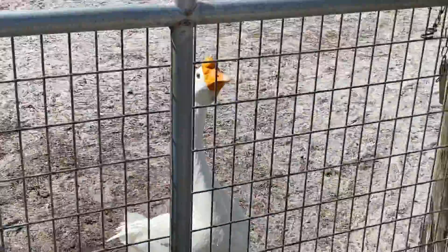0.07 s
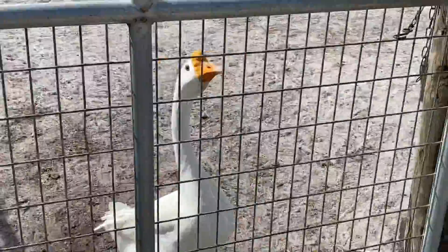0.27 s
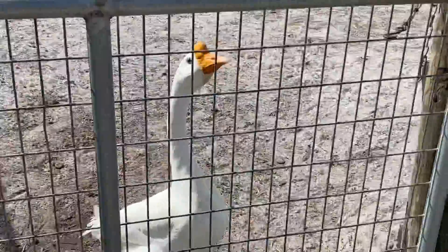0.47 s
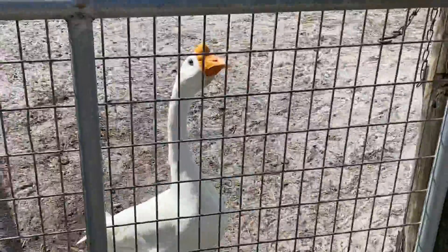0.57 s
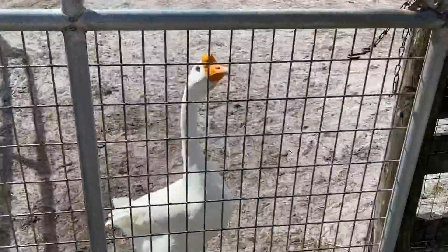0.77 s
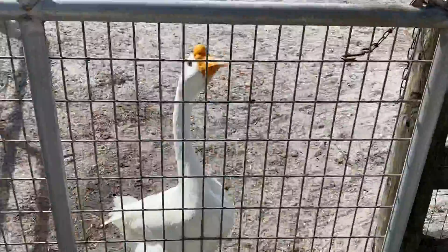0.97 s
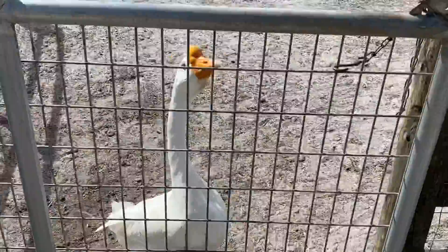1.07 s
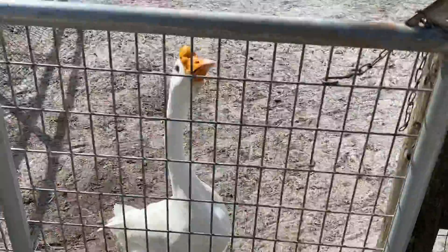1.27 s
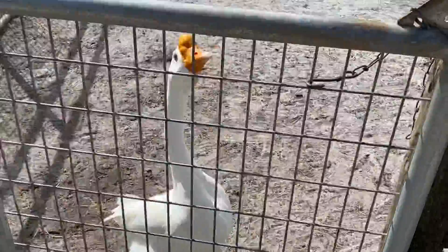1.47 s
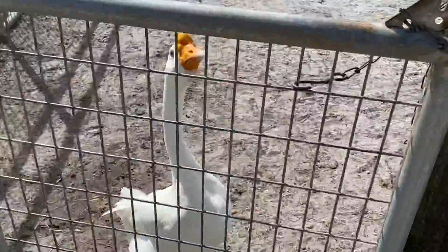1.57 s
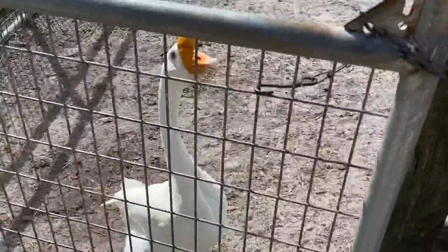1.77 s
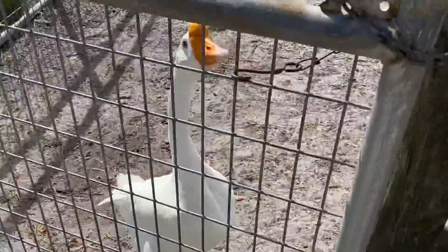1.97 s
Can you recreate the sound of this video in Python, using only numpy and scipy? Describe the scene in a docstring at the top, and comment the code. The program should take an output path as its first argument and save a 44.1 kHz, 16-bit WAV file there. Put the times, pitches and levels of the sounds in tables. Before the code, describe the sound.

Single loud goose honk a few steps away in an open dirt pen, with faint handling knocks.

```python
"""A goose gives one honk from a few steps away in an outdoor pen.
A low flutter of air with a faint hum and a hiss run throughout; scuffs, soft knocks and bumps come and go.
The call swells on a low note, cracks up a fifth into a brassy blare, beats against a second, higher note,
sinks into a hoarse grunt and dies away on a few wavering tones. Notes are stacks of trembling harmonics;
rasp, hiss and scuffs are coloured noise; knocks are fading sine tones with a tick."""
import sys
import numpy as np
from scipy import signal
from scipy.fft import rfft, irfft
from scipy.io import wavfile

SR = 44100
rng = np.random.default_rng(int(sys.argv[2]) if len(sys.argv) > 2 else 0)


def wav_record(signal):
    """Record a signal, one row per channel, as 16-bit PCM in the file named by sys.argv[1]."""
    frames = np.transpose(np.atleast_2d(signal))
    bounded = np.clip(frames, -1, 1)
    # unit amplitude maps onto the largest positive 16-bit level
    quanta = np.round(bounded * 32767).astype(np.int16)
    wavfile.write(sys.argv[1], SR, quanta)


N = 88861
T = np.arange(N) / SR  # time of every sample, in seconds


def from_db(db):
    """Decibels to gain."""
    return 10 ** (np.asarray(db) / 20)


def rms_one(x):
    """Scale to an average strength (rms) of 1."""
    return x / np.sqrt(np.mean(x ** 2) + 1e-20)


def in_time(rows):
    """Each column of a curve after the first (seconds), read at every sample."""
    s, *columns = np.transpose(rows)
    return [np.interp(T, s, c) for c in columns]


def gate(rows):
    """Open from the first to the last time of a curve, with 3 ms fades."""
    first_s, last_s = rows[0][0], rows[-1][0]
    return np.clip(np.minimum(T - first_s, last_s - T) / .003, 0, 1)


def at_hz(points, hz):
    """Read a spectrum at any frequency, with even steps per octave."""
    f, v = np.transpose(points)
    return np.interp(np.log(np.maximum(hz, 1)), np.log(f), v)


def drift(rate_hz):
    """Smooth random wandering with spread 1: noise with its fast changes filtered out."""
    r = np.exp(-2 * np.pi * rate_hz / SR)
    raw = rng.standard_normal(N + SR)
    settled = signal.lfilter([1], [1, -2 * r, r * r], raw)[SR:]  # skip the filter's first second
    return rms_one(settled)


def noise(spectrum):
    """Random noise coloured by a spectrum, with rms 1."""
    gain = from_db(at_hz(spectrum, np.fft.rfftfreq(N, 1 / SR)))
    return rms_one(irfft(rfft(rng.standard_normal(N)) * gain, N))


def wide_noise(spectrum):
    """Coloured stereo noise: separate middle and side noises give the width of the open air."""
    # Each row: frequency in Hz, side minus middle in dB.
    width = [(50, -13.5), (140, -12), (300, -11), (700, -8), (1500, -1), (3000, -18.5), (6000, -31.5),
             (8500, 8.5), (11000, -9.5), (14000, 1.5)]
    side_gain = from_db(at_hz(width, np.fft.rfftfreq(N, 1 / SR)))
    mid = noise(spectrum)
    side = irfft(rfft(noise(spectrum)) * side_gain, N)
    return rms_one(np.array([mid + side, mid - side]))


def cycle(hz, jitter):
    """Phase in radians of a tone whose pitch trembles; jitter is the spread as a share of the pitch."""
    trembling_hz = hz * (1 + jitter * drift(244))
    return 2 * np.pi * np.cumsum(trembling_hz) / SR


def partial(phase, db):
    """One harmonic whose level shimmers a little, starting at a random point of its cycle."""
    shimmer_db = 1.28 * drift(54)
    return from_db(db + shimmer_db) * np.cos(phase + rng.uniform(0, 2 * np.pi))


def rough_air(rows, spectrum, flicker_db):
    """Air forced through the throat in uneven puffs: coloured noise with a flickering level."""
    level_db = in_time(rows)[0] + flicker_db * drift(330)
    return from_db(level_db) * gate(rows) * noise(spectrum)


def background():
    """Low flutter of air with a faint wavering hum, and a hiss; both dip during or after the call."""
    # Loudness of the flutter and of the hiss. Each row: time in seconds, level in dB.
    flutter, hiss = [(0, -45.5), (.45, -45), (.65, -48), (.86, -46), (1.0, -47.5), (1.2, -46),
                     (1.35, -61.5), (1.55, -46.5), (1.72, -48), (1.82, -48.5), (2.01, -45)], [(0, -45.5), (.19, -46), (.3, -46), (.7, -46.5), (.88, -47.5),
                                      (1.1, -46.5), (1.3, -46.5), (1.45, -58.5), (1.6, -48.5),
                                      (2.01, -50.5)]
    # Their colours. Each row: frequency in Hz, relative level in dB.
    flutter_spectrum, hiss_spectrum = [(22, -28), (38, -7), (60, -2.5), (90, -2.5), (125, -8.5), (180, -11),
                                       (240, -15.5), (400, -25), (900, -39.5), (3000, -56)], [(150, -21), (300, -1.5), (550, -2.5),
                                                                 (800, 0.5), (1300, -2), (2500, -1.5),
                                                                 (5000, -4), (7000, -6), (8500, -14.5),
                                                                 (10000, -6), (12000, -18.5), (14000, -9),
                                                                 (16000, -18)]
    hum_db = -7 + 2 * drift(6.8)  # relative to the flutter
    hum = from_db(hum_db) * np.sin(cycle(174.6, jitter=0.017))
    low_air = from_db(in_time(flutter)[0]) * (wide_noise(flutter_spectrum) + hum)
    high_air = from_db(in_time(hiss)[0]) * wide_noise(hiss_spectrum)
    return low_air + high_air


def bumps():
    """Soft low bumps on the microphone: sine tones that swell and fade within a few cycles."""
    # Each row: middle in seconds, level in dB, pitch in Hz.
    bump_rows = [(0.426, -39.5, 67.6), (.845, -38.5, 76), (0.949, -32, 67), (1.827, -33, 81.5),
                 (1.95, -36, 63.6)]
    out = np.zeros(N)
    for s, db, hz in bump_rows:
        cycles = (T - s) * hz
        swell = np.exp(-(cycles / 0.88) ** 2)
        out += from_db(db) * swell * np.sin(2 * np.pi * cycles)
    return out


def scuffs():
    """Short grainy rubs on dry dirt: swells of coloured noise with a quickly flickering level."""
    # Each row: middle in seconds, level in dB, length (spread of the swell) in seconds.
    scuff_rows = [(0.101, -44.5, 0.0044), (0.201, -47.5, 0.034), (0.795, -48, 0.015), (0.883, -53, 0.031),
                  (1.607, -51, 0.018)]
    # Each row: frequency in Hz, relative level in dB.
    spectrum = [(200, -28), (650, 6.5), (1400, -1.5), (2500, -8), (6000, -21)]
    level = sum(from_db(db) * np.exp(-.5 * ((T - s) / length) ** 2) for s, db, length in scuff_rows)
    return level * from_db(4.9 * drift(200)) * noise(spectrum)


def knocks():
    """Dull, quickly damped knocks: a few fading sine tones, each knock with a small noisy tick."""
    # Each row: start in seconds, level in dB, centre of the colour in Hz, tick in dB relative to the knock.
    knock_rows = [(0.4026, -26, 620, -12), (0.8062, -34.5, 790, -32), (1.481, -19, 430, -8),
                  (1.541, -32.5, 651, -18)]
    # The tones they ring with. Each row: pitch in Hz, relative level in dB, seconds to fade by 60 dB.
    modes = [(115, -15, 0.11), (353, -2.5, 0.033), (511, -2.5, 0.039), (782, 2, 0.028), (1370, -2.5, 0.016),
             (2100, 4, 0.0067), (2800, -10, .025)]
    # Colour of the tick. Each row: frequency in Hz, relative level in dB.
    tick_spectrum = [(1800, 5), (3200, -15), (6000, -11), (12000, -27)]
    fall_db_per_octave, tick_s = 4, 0.0018
    out = np.zeros(N)
    for s, db, centre_hz, tick_db in knock_rows:
        age = np.maximum(T - s, 0)
        body = np.zeros(N)
        for k, (hz, level_db, t60) in enumerate(modes):
            octaves_away = abs(np.log2(hz / centre_hz))
            ring_db = level_db - fall_db_per_octave * octaves_away - 60 * age / t60
            sign = (-1) ** k  # every other tone starts downwards
            body += sign * from_db(ring_db) * np.sin(2 * np.pi * hz * age)
        tick = from_db(tick_db) * (T > s) * np.exp(-age / tick_s) * noise(tick_spectrum)
        out += from_db(db) * (body + tick)
    return out


def side_note(rows, harmonics_db, jitter):
    """A note beside the blare, built from its harmonics: its sound and its phase."""
    hz, db, overtones_db = in_time(rows)
    phase = cycle(hz, jitter)
    sound = sum(partial(k * phase, h + overtones_db * (k > 1)) for k, h in enumerate(harmonics_db, 1))
    return from_db(db) * gate(rows) * sound, phase


def low_note():
    """The opening note of the call, which lingers under the blare."""
    # Each row: time in seconds, pitch in Hz, level in dB, extra level of the overtones in dB.
    curve = [(1.138, 681.6, -57, -16), (1.15, 693, -31, 4.5), (1.165, 743.6, -23.5, 2),
             (1.18, 765, -13, -8.5), (1.2, 798, -10, -23.5), (1.212, 761, -27, -25), (1.228, 755, -34, -25),
             (1.262, 780.7, -21, -23), (1.3, 799, -42, -22), (1.39, 779, -41, -22)]
    # Relative level in dB of each harmonic, from the first upwards.
    harmonics_db = [2, -7, -9.5, -12, -16.5, -14.5, -27, -27, -53]
    return side_note(curve, harmonics_db, jitter=0.0057)


def high_note():
    """The second, higher note, which joins late in the blare."""
    # Each row: time in seconds, pitch in Hz, level in dB, extra level of the overtones in dB.
    curve = [(1.308, 1425, -68, -11), (1.322, 1441, -34, 7), (1.355, 1454, -42.5, 4.5),
             (1.378, 1449, -31, 4.5), (1.392, 1442, -37, 5), (1.408, 1410, -62, -18)]
    # Relative level in dB of each harmonic, from the first upwards.
    harmonics_db = [5, 2.5, -12, -5.5, -20, -31, -13.5]
    return side_note(curve, harmonics_db, jitter=0.0051)


def blare():
    """Brassy main note: nine harmonics of a membrane, coloured by the throat; its sound and its phase."""
    # Each row: time in seconds, pitch in Hz, level in dB, extra for the octave in dB,
    # extra for the upper overtones in dB.
    curve = [(1.198, 1106, -56, -17, -13), (1.204, 1122, -13, -6.5, -23), (1.222, 1143, -15, -1.5, -1),
             (1.242, 1161, -14.5, -2.5, -2), (1.268, 1172, -17.5, -6.5, 9.5), (1.288, 1178, -19, -10.5, 9),
             (1.315, 1197, -20, -5.5, 1.5), (1.328, 1190, -21.5, -13, 2), (1.347, 1185, -16.5, -4, -4),
             (1.361, 1198, -22, 6.5, -5), (1.376, 1230, -39, 6, -14), (1.39, 1210, -66, 0, -7)]
    # What the throat lets through. Each row: frequency in Hz, relative level in dB.
    throat = [(1150, 2.5), (2350, 3), (3420, -24), (3500, -11), (3600, -16.5), (4500, 5), (4590, -2.5),
              (4680, -16), (4800, -7), (5700, -18), (5870, -20.5), (6800, -26), (7070, -23), (8300, -25),
              (9300, -60), (10700, -28.5)]
    hz, db, octave_db, upper_db = in_time(curve)
    phase = cycle(hz, jitter=0.0036)
    extra_db = [0, octave_db] + [upper_db] * 7
    sound = sum(partial(k * phase, db + at_hz(throat, k * hz) + extra)
                for k, extra in enumerate(extra_db, 1))
    return gate(curve) * sound, phase


def beats(rows, pairs, blare_phase, note_phase):
    """Sum and difference tones of two coupled membranes."""
    db, upper_db = in_time(rows)
    out = np.zeros(N)
    for n, m, level_db in pairs:
        mixed_phase = n * blare_phase + m * note_phase
        hz = np.gradient(mixed_phase) * SR / (2 * np.pi)
        upper = np.average(hz, weights=gate(rows)) > 3000
        out += partial(cycle(hz, jitter=.002), db + level_db + upper_db * upper)
    return out * gate(rows)


def low_beats(blare_phase, low_phase):
    """Mixed tones of the blare and the low note."""
    # Each row: time in seconds, level in dB, extra for tones above 3 kHz in dB.
    curve = [(1.199, -24, -10), (1.208, -21, -25), (1.226, -36, -2), (1.242, -25, 0), (1.262, -20, -0.5),
             (1.274, -32, -4), (1.292, -35, 0), (1.325, -50, 2)]
    # Each row: multiple of the blare, multiple of the low note, relative level in dB.
    pairs = [(1, 1, 0), (3, -1, -1), (2, 1, -19), (4, -1, -11), (3, 1, -14), (5, -1, -12), (4, 1, -20),
             (6, -1, -15), (5, 1, -21), (7, -1, -17), (6, 1, -24)]
    return beats(curve, pairs, blare_phase, low_phase)


def high_beats(blare_phase, high_phase):
    """Mixed tones of the blare and the high note."""
    # Each row: time in seconds, level in dB, extra for tones above 3 kHz in dB.
    curve = [(1.313, -52, 2), (1.324, -34.5, 6.5), (1.345, -25, -3), (1.356, -23.5, 2), (1.366, -20, -32),
             (1.378, -25.5, -26), (1.39, -48, -11)]
    # Each row: multiple of the blare, multiple of the high note, relative level in dB.
    pairs = [(2, -1, -13), (-1, 2, -16), (-2, 3, -13), (3, -1, -13), (1, 1, 0), (4, -1, -19), (2, 1, -5),
             (1, 2, -15), (3, 1, -3), (2, 2, -15), (4, 1, -7), (5, 1, -16), (6, 1, -26), (8, 1, -27)]
    return beats(curve, pairs, blare_phase, high_phase)


def rasp(blare_phase):
    """Rasp of the membranes, and grit in the top of the call that pulses with each cycle of the blare."""
    # Loudness of the rasp and of the grit. Each row: time in seconds, level in dB.
    rasp_level, grit_level = [(1.14, -73), (1.16, -40), (1.196, -40), (1.206, -20.5), (1.235, -26.5),
                              (1.27, -34), (1.305, -34), (1.33, -33.5), (1.36, -32), (1.385, -32),
                              (1.403, -48), (1.42, -71)], [(1.2, -62), (1.212, -47), (1.24, -46), (1.275, -37),
                                            (1.315, -46), (1.335, -39), (1.355, -32.5), (1.372, -50),
                                            (1.395, -61)]
    # Their colours. Each row: frequency in Hz, relative level in dB.
    rasp_throat, grit_spectrum = [(300, -62), (640, -47), (760, -19), (930, 13), (1080, -21), (1350, 0),
                                  (1600, -23), (2000, 0), (2700, -4), (3200, -4.5), (4600, -6.5),
                                  (5400, -13.5), (6200, -11), (8000, -24), (15000, -39)], [(3000, -13), (5000, -10), (6300, -8), (8000, -1),
                                                       (9500, 3), (10800, -2), (12200, -29), (14000, 0),
                                                       (16000, -26)]
    pulse = 1 + 0.51 * np.cos(blare_phase)
    grit = rough_air(grit_level, grit_spectrum, flicker_db=1.5) * pulse
    return rough_air(rasp_level, rasp_throat, flicker_db=1.2) + grit


def honk():
    """The blare, the two notes that beat against it, and rasp."""
    low, low_phase = low_note()
    high, high_phase = high_note()
    main, phase = blare()
    mixed = low_beats(phase, low_phase) + high_beats(phase, high_phase)
    return low + high + main + mixed + rasp(phase)


def grunt():
    """The slackening membrane sinks in pitch and turns hoarse: twelve harmonics plus rough air."""
    # Each row: time in seconds, pitch in Hz, level in dB.
    curve = [(1.375, 604, -70), (1.395, 572.3, -39), (1.412, 497, -34.5), (1.423, 449, -24.5),
             (1.433, 439.3, -25), (1.448, 437.6, -28.5), (1.465, 410, -46), (1.482, 390, -42.5),
             (1.5, 441, -40), (1.528, 423, -67), (1.545, 404, -52)]
    # Loudness of the hoarseness. Each row: time in seconds, level in dB.
    hoarse = [(1.38, -54), (1.41, -35), (1.428, -35), (1.45, -54), (1.468, -31), (1.5, -38.5),
              (1.527, -52.5), (1.55, -52)]
    # Throat for the voice and for the hoarse air. Each row: frequency in Hz, relative level in dB.
    voice_throat, hoarse_throat = [(380, -45), (470, -3.5), (600, 11), (720, 24), (880, 4), (1100, -22),
                                   (1350, -7), (1800, -14), (2250, -8.5), (2650, -9), (3000, -23),
                                   (4300, -27), (7000, -38)], [(400, -25), (690, -13), (790, -2), (900, 7.5),
                                                         (1030, 11.5), (1200, -21), (1500, -40), (1630, 13),
                                                         (1780, -38), (2200, -18), (2500, -10), (2950, -37),
                                                         (4300, -32), (7000, -33)]
    hz, db = in_time(curve)
    phase = cycle(hz, jitter=0.029)
    voice = np.zeros(N)
    for k in range(1, 13):
        flicker_db = 1.5 * drift(65)
        voice += partial(k * phase, db + at_hz(voice_throat, k * hz) + flicker_db)
    return voice * gate(curve) + rough_air(hoarse, hoarse_throat, flicker_db=4.0)


def aftertone():
    """A few tones of wavering pitch as the call runs out of air."""
    # Each row: time in seconds, level in dB.
    curve = [(1.452, -56), (1.467, -46), (1.482, -50), (1.497, -38), (1.524, -38.5), (1.54, -67)]
    # Each row: pitch in Hz, relative level in dB.
    tones = [(785, 6), (1020, 0), (1620, -16), (2460, -21)]
    db, = in_time(curve)
    sound = sum(partial(cycle(hz, jitter=0.0107), db + level_db) for hz, level_db in tones)
    return gate(curve) * sound


def at_ports(x):
    """Left and right: level and phase differences between the two microphone ports."""
    # Each row: frequency in Hz, left minus right in dB.
    balance = [(60, 1), (110, 1.0), (200, 4), (380, 3), (700, 1.5), (1290, 3.5), (2380, 2.5), (4400, 2.5),
               (8120, 0), (15000, 0.0)]
    # Each row: frequency in Hz, radians by which the left leads.
    lead = [(100, 0), (700, 0.12), (1200, 0.4), (2400, 0.62), (4000, .5), (6800, 0.42), (8500, 2.5),
            (11000, 2), (14000, 1.8)]
    hz = np.fft.rfftfreq(N, 1 / SR)
    # Half of the difference goes to the left, the opposite half to the right.
    half = from_db(at_hz(balance, hz) / 2) * np.exp(.5j * at_hz(lead, hz))
    return irfft(rfft(x) * np.array([half, 1 / half]), N)


def pen(x):
    """Faint, dull scatter from ground, fence and sheds: fading noise as echo, different on each side."""
    echo_db, t60_s, cut_hz = -26, 0.53, 3700
    fade = from_db(-60 * T / t60_s) * (T > .006)  # the echo starts after 6 ms
    tail = rng.standard_normal((2, N)) * fade
    tail = signal.sosfilt(signal.butter(2, cut_hz, fs=SR, output="sos"), tail)
    tail /= np.sqrt((tail ** 2).sum(axis=1, keepdims=True))
    return from_db(echo_db) * signal.fftconvolve(x[None], tail, axes=1)[:, :N]


def scene():
    """The goose a little to the left, in its pen."""
    goose = honk() + grunt() + aftertone()
    small = knocks() + scuffs()
    return at_ports(goose) + small + pen(goose + small) + bumps() + background()


def record(dry):
    """The top is cut steeply above 15.6 kHz."""
    return signal.sosfilt(signal.ellip(10, .1, 80, 15600, fs=SR, output="sos"), dry)


dry = scene()
out = record(dry)
wav_record(out)
```